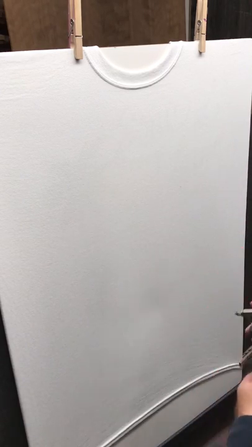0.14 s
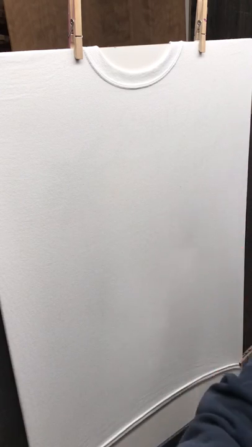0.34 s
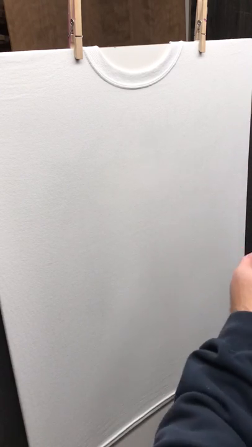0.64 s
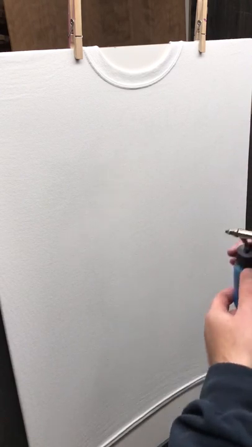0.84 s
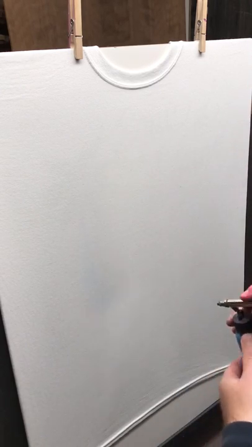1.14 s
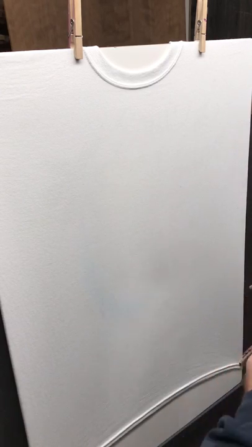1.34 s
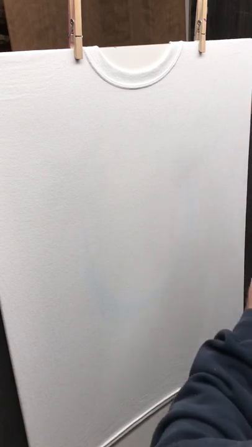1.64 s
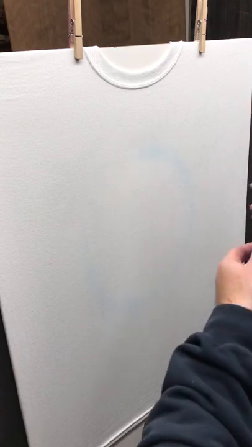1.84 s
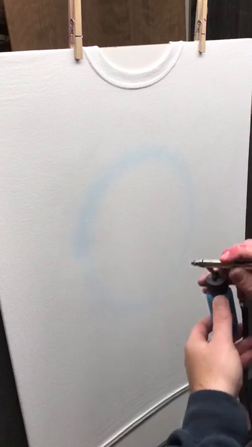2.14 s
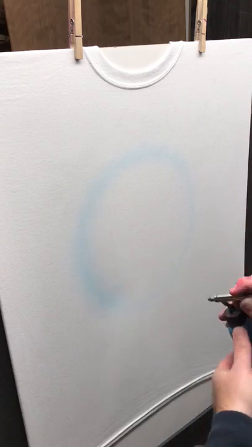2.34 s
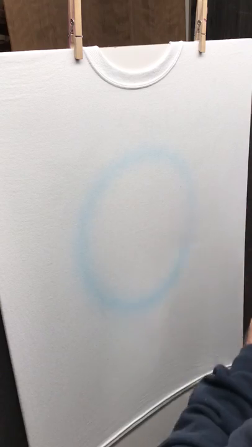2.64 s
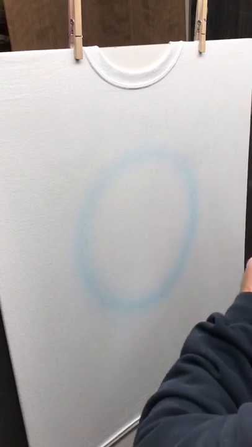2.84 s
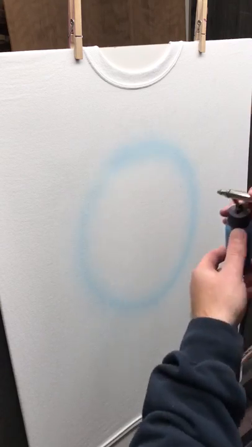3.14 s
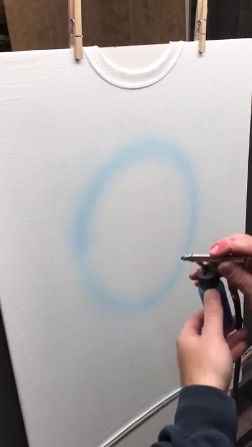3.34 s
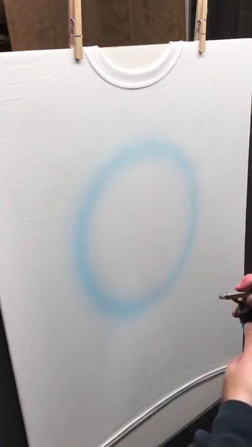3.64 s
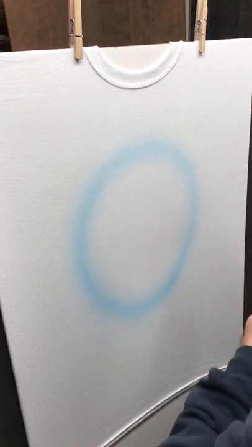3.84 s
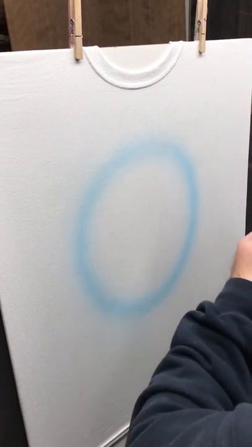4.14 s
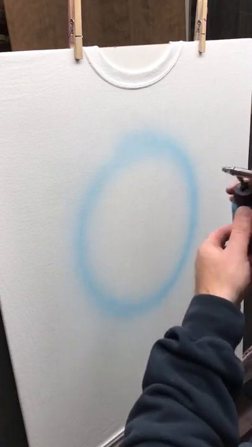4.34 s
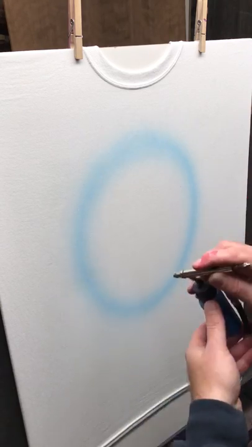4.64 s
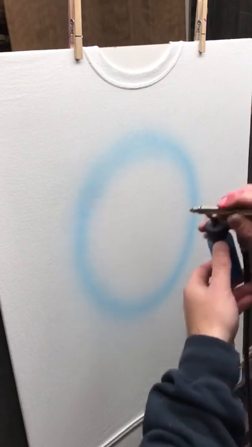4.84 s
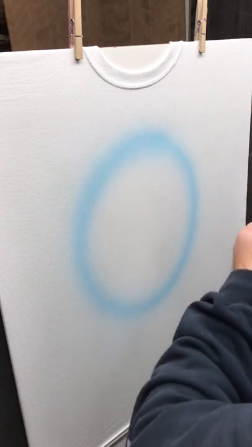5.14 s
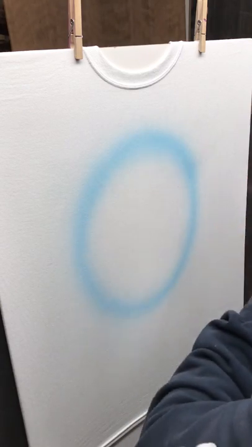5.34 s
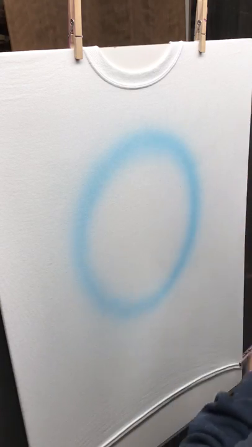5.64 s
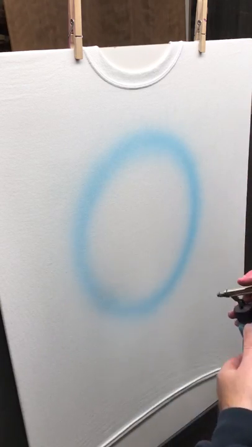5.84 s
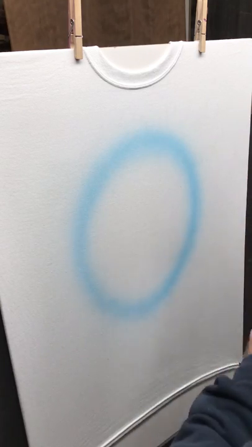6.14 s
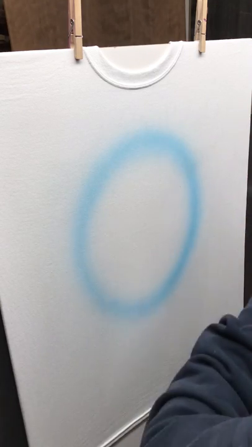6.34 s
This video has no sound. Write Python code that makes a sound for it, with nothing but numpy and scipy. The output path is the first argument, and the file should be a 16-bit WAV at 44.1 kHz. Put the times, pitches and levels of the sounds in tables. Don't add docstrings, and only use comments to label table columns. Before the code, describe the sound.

Steady high hiss of compressed air rises and falls as a hand circles over cloth, thickened by rough wet spray, with faint dull bumps.

```python
import sys
import numpy as np
from scipy import signal
from scipy.fft import rfft, irfft, next_fast_len
from scipy.io import wavfile
from scipy.ndimage import uniform_filter1d, map_coordinates

SR = 44100
rng = np.random.default_rng(int(sys.argv[2]) if len(sys.argv) > 2 else 0)


def store_pcm(level_fs):
    pcm = np.round(np.clip(level_fs, -1, 1) * 32767).astype(np.int16)
    wavfile.write(sys.argv[1], SR, np.atleast_2d(pcm).T)


def volts(x):
    e = np.asarray(x, float) / 20
    return 10 ** e


N = 285768
TIME_S = np.arange(N) / SR
TOP_HZ = 15780
DRY_RASP_DB = -66.5


def unit(x):
    return x / np.sqrt(np.mean(x ** 2) + 1e-20)


def wobble(rate_hz):
    points = rng.standard_normal(int(N * rate_hz / SR) + 4)
    return map_coordinates(points, [np.arange(N) * rate_hz / SR])


def filtered(x, response):
    size = next_fast_len(x.shape[-1] + 8192)
    spectrum = rfft(x, size) * response(np.fft.rfftfreq(size, 1 / SR))
    return irfft(spectrum, size)[..., :x.shape[-1]]


def by_hand(rows, t=TIME_S):
    # time_s, turns (gone round, 0 = nearest the microphone), lean (to the cloth)
    hand_path = [(0.0, 0.2, -1.4), (0.3, 0.42, -1.32), (0.6, 0.61, -1.14), (0.95, 1.02, -0.74),
                 (1.3, 1.22, -0.85), (1.65, 1.6, -0.68), (2.0, 1.92, 0.34), (2.35, 2.21, -0.27),
                 (2.7, 2.5, 0.14), (3.1, 2.77, 0.35), (3.5, 3.12, 0.73), (3.9, 3.47, 0.51),
                 (4.3, 3.69, 0.11), (4.75, 4.15, 0.9), (5.15, 3.87, 0.58), (5.6, 3.66, 0.65),
                 (6.1, 3.54, 0.54), (6.48, 3.69, 0.47)]
    s, turns, lean = np.transpose(hand_path)
    angle = 2 * np.pi * np.interp(t, s, turns)
    towards, height = np.cos(angle), np.sin(angle)
    return np.array(rows) @ np.array([np.ones(len(t)), towards, height, np.interp(t, s, lean)])


def air():
    # time_s, level_db
    jet_levels = [(0, -36), (.25, -43.5), (.54, -44.5), (1.03, -32.5), (1.44, -39.5), (1.64, -41.5),
                  (1.97, -30.5), (2.31, -31.5), (2.52, -38.5), (2.75, -39), (3.2, -30.5), (3.46, -31),
                  (3.73, -39), (4.1, -37.5), (4.5, -29.5), (5.12, -30.5), (5.6, -38), (6.48, -38)]
    # start_s, least_s, back_s, loss_db
    eases = [
        (4.582, 4.797, 4.948, 9),
        (5.706, 6.16, 6.35, 3.5),
    ]
    s, db = np.transpose(jet_levels)
    level_db = np.interp(TIME_S, s, db)
    for start, least, back, loss_db in eases:
        angle = np.interp(TIME_S, [start, least, back], [0, np.pi / 2, 0])
        level_db = level_db - loss_db * np.sin(angle)
    return level_db


def swing():
    level_db = air()
    return level_db - level_db.mean()


def trigger():
    # start_s, end_s, rasp_db, rise_s, fall_s
    pulls = [
        (0.883, 1.3, -61, 0.12, .35),
        (1.753, 4.587, -53, 0.25, 0.059),
        (4.882, 5.852, -52, 0.17, 0.057),
        (6.21, 6.6, -50.5, 0.12, .1),
    ]
    gains_db = []
    for start, end, db, rise, fall in pulls:
        gain_db = db - DRY_RASP_DB
        grown_db = gain_db + 1.5 * (end - start)
        corners_s = [start, start + rise, end, end + fall]
        gains_db.append(np.interp(TIME_S, corners_s, [0, gain_db, grown_db, 0]))
    return DRY_RASP_DB + np.max(gains_db, axis=0)


def wetness():
    return np.clip((trigger() - DRY_RASP_DB) / 15, 0, 1)


def rush(spectrum, patchy_db, size, edge=0, edge_db=0, notch_db=0):
    # edge_hz, then hz per towards, height, lean
    edge_rows = [
        (2520, -370, 350, 40),
        (555, -30, -5, -120),
    ]
    hz, t, noise = signal.stft(rng.standard_normal(N), SR, nperseg=1024, noverlap=768)
    edges_hz = by_hand(edge_rows, t)
    stretch = 1900 / edges_hz[0]

    patches = uniform_filter1d(rng.standard_normal(noise.shape), size[0], 0)
    patches = uniform_filter1d(patches, size[1], 1)
    bins, frames = np.indices(noise.shape)
    patches = map_coordinates(patches, [bins * stretch, frames], order=1, mode="mirror")

    f, db = np.transpose(spectrum)
    colour_db = np.interp(np.log(hz + 1), np.log(f), db)[:, None]
    below_edge = 1 / (1 + (hz[:, None] / edges_hz[edge]) ** 12)
    notch = np.exp(-((hz[:, None] * stretch / 1800 - 1) / 0.06) ** 2)
    colour_db = colour_db - edge_db * below_edge - notch_db * notch
    shaped = noise * volts(colour_db + patchy_db * unit(patches))
    return unit(signal.istft(shaped, nperseg=1024, noverlap=768)[1][:N])


def late(x, delay_ms):
    return map_coordinates(x, [np.arange(N) - delay_ms * SR / 1000], mode="nearest")


def reflected(x, strength):
    # delay_ms, then ms per towards, height, lean
    delays = [
        (0.455, -0.017, -0.011, 0.058),
        (0.644, 0.066, 0.063, -0.081),
        (0.28, -0.007, 0.022, 0.011),
        (0.789, 0.095, -0.019, -0.062),
        (0.407, 0.102, 0.004, -0.085),
        (0.641, 0.065, -0.035, -0.068),
    ]
    shares = [
        (-0.132, -0.005, 0.094, -0.079),
        (0.105, -0.051, -0.042, 0.052),
        (-0.158, 0.115, -0.004, -0.027),
        (0.164, -0.068, -0.091, 0.072),
        (0.129, 0.029, -0.055, 0.018),
        (0.197, 0.075, 0.092, 0.099),
    ]
    dull_corners = [8400, 6300, 8300, 4900, 9100, 6000]
    out = x.copy()
    for corner_hz, delay_ms, share in zip(dull_corners, by_hand(delays), by_hand(shares)):
        dull = filtered(x, lambda hz: 1 / (1 + (hz / corner_hz) ** 3))
        out += strength * share * late(dull, delay_ms)
    return out


def room():
    # pitch_hz, level_db
    rustle_colour = [(15, -47), (25, -24), (64, -5), (144, -5.5), (178, -3.5), (217, -4.5), (383, -7),
                     (557, -12.5), (619, -3.5), (900, -34), (1170, -57), (1980, -120)]
    hum_colour = [(20, -30), (40, 1), (70, 0), (100, -4), (150, -43)]  # pitch_hz, level_db
    rustle_db = -70.5 + 0.067 * swing() + 1.2 * wobble(21)
    rustle = rush(rustle_colour, patchy_db=2.0, size=(2, 12))
    hum = rush(hum_colour, patchy_db=-0.5, size=(1, 30))
    return volts(rustle_db) * rustle + volts(-81.0) * hum


def knocks():
    # start_s, peak_db, pitch_hz, t60_s (time to fade by 60 dB)
    knock_list = [(.009, -60, 222, 0.075), (.09, -60, 392, 0.24), (0.179, -59.5, 177.6, 0.38),
                  (1.218, -54, 288, 0.084), (1.581, -60, 85, .2), (2.97, -62, 200, 0.07),
                  (3.314, -44, 290, 0.049), (3.325, -48.5, 210, 0.094), (3.679, -58, 176, 0.36),
                  (4.569, -52, 277, .07), (6.02, -66, 148, 0.38)]
    out, t = np.zeros(N + SR), np.arange(SR // 2) / SR
    for start, peak_db, hz, t60 in knock_list:
        ring = np.sin(2 * np.pi * hz * t) + 0.45 * np.sin(2 * np.pi * 2.5 * hz * t)
        soft_start = 1 - np.exp(-t / (0.046 * t60))
        out[round(start * SR):][:len(t)] += volts(peak_db - 60 * t / t60) * soft_start * ring
    return out[:N]


def paint():
    # pitch_hz, level_db
    rasp_colour = [(300, -20), (450, 2), (700, 1.5), (900, -0.5), (1100, -0.5), (1400, -6), (1800, -5.5),
                   (2600, -9.5), (4000, -20.5)]
    rasp = rush(rasp_colour, patchy_db=2.0, size=(2, 40), edge=1, edge_db=16.5, notch_db=0.5)
    rasp = reflected(rasp, strength=0.67)
    half_open = 4 * wetness() * (1 - wetness())
    mist = 2.14 * half_open * filtered(rasp, lambda hz: 1 / (1 + (1810 / (hz + 1)) ** 6))
    level_db = trigger() + 0.072 * swing() + 0.43 * wobble(16)
    return volts(level_db) * unit(rasp + mist)


def jet():
    # pitch_hz, level_db
    hiss_colour = [(500, -22), (1200, -21), (2000, -11.5), (3000, -7.5), (4000, -8.5), (5000, -7.5),
                   (6000, -9), (6150, -8), (7000, -4), (8000, -2.5), (10500, -1), (12000, 2), (15000, 3),
                   (17000, -9)]
    # mean_db, then db per towards, height, lean
    body_aim = [(0.1, .3, 0.28, 0.12)]
    hiss = rush(hiss_colour, patchy_db=1.29, size=(9, 22), edge_db=7.5, notch_db=3.0)
    hiss = reflected(hiss, strength=0.95)
    top = filtered(hiss, lambda hz: hz > 6075)
    body = hiss - top
    body_db = -46.91 + by_hand(body_aim)[0] + 0.67 * swing()
    body_db += 2.5 * np.minimum(1, 2 * wetness())
    flutter_db = 0.053 * wobble(12) + 0.38 * wobble(45) + 0.5 * wobble(300)
    return volts(flutter_db) * (volts(air()) * unit(top) + volts(body_db) * unit(body))


def scene():
    return np.tile(jet() + paint() + room() + knocks(), (2, 1))


def stray_treble(mid):
    side, fade = np.zeros(N + 4096), np.hanning(2048) ** 1.6
    padded = np.pad(mid, 2048, mode="reflect")
    for when, low, wide in rng.random((47, 3)):
        at = 586 + 1024 * int(when * (N // 1024 - 1))
        low_hz = 4100 + (14400 - 4100) * low ** 1.7
        high_hz = min(TOP_HZ, low_hz + 1500 * (0.71 + wide ** 2))
        backward = padded[at + 1024:at + 3072][::-1]
        band = filtered(backward, lambda hz: (hz > low_hz) & (hz < high_hz))
        side[at:at + 2048] += volts(-0.3) * fade * band
    return side[1024:N + 1024]


def band_limit(x):
    return signal.sosfilt(signal.butter(12, 17090, fs=SR, output="sos"), x)


def record(dry):
    mid = filtered(dry[0], lambda hz: (hz < TOP_HZ) / (1 + (42 / (hz + 1)) ** 4))
    side = stray_treble(mid)
    return band_limit(np.array([mid + side, mid - side]))


dry = scene()
out = record(dry)
store_pcm(out)
```